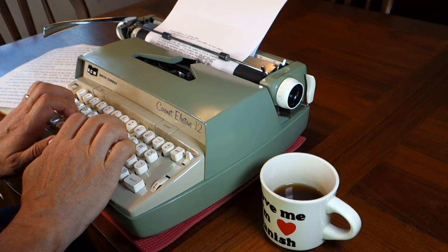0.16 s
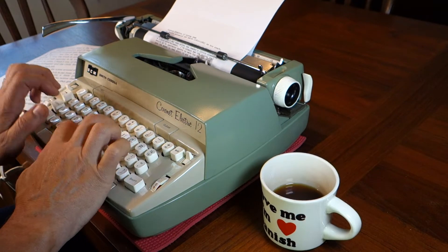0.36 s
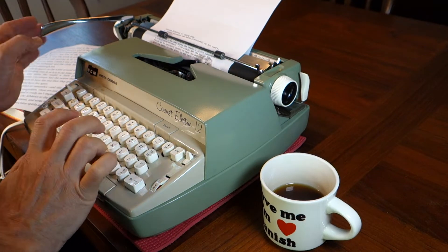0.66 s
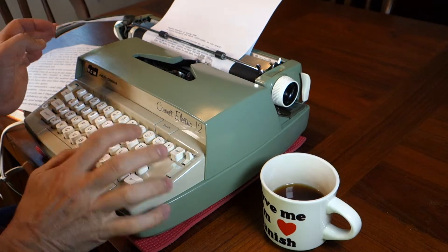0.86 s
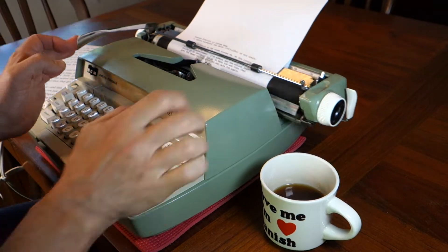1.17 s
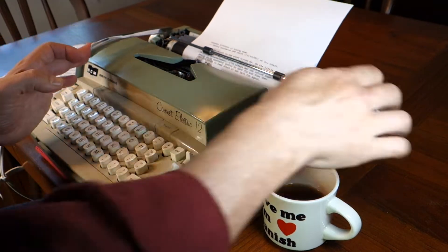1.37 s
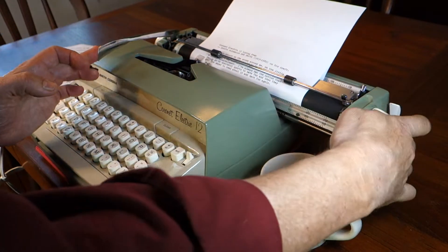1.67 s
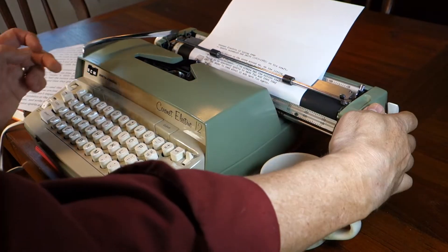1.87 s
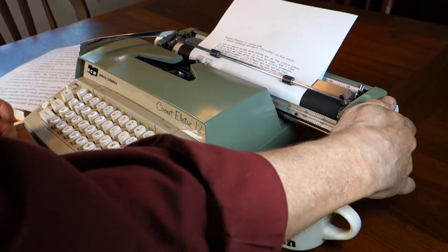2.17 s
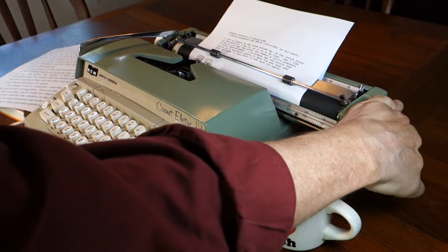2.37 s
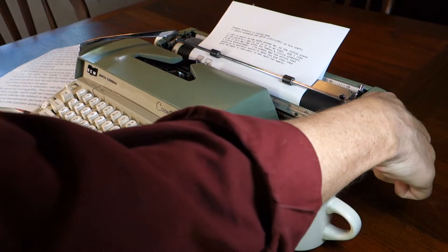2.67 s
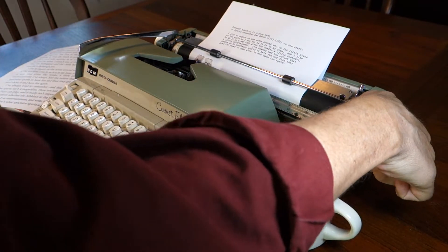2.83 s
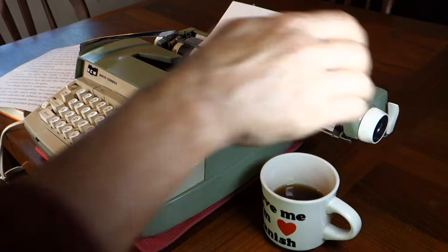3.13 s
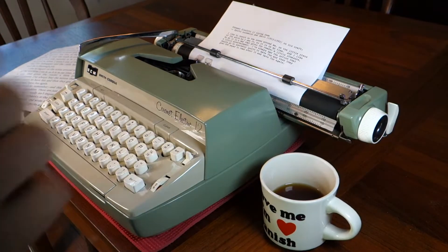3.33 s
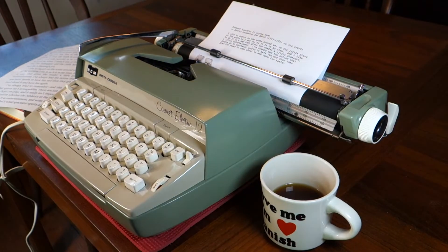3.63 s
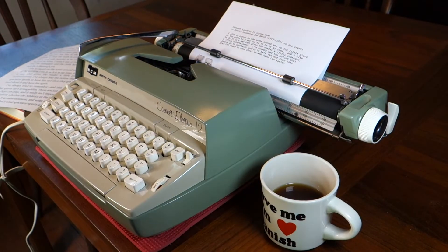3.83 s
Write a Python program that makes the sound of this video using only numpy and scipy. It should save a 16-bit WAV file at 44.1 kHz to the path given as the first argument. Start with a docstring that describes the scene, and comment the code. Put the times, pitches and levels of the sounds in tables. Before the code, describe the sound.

An electric typewriter strikes a few sharp letters, then its carriage slides and hits its stop. The roller knob clicks round and dull knocks follow, over a faint motor hum, close up in a small room.

```python
"""Electric typewriter in a small, live room

The machine stands on a wooden table, close to a stereo microphone. Its motor hums faintly throughout.
A few typebars strike and fall back; the carriage is released, slides and hits its stop. Then the platen
knob is turned through its ratchet, the carriage is pushed over with dull knocks, and a hand scuffs away."""
import sys
import numpy as np
from scipy import signal
from scipy.fft import rfft, irfft
from scipy.io import wavfile
from scipy.ndimage import uniform_filter1d

SR = 44100
rng = np.random.default_rng(int(sys.argv[2]) if len(sys.argv) > 2 else 0)


def wrap_up_sound(samples):
    """Save the sound to the file named by the first command line argument, as 16-bit audio."""
    columns = np.atleast_2d(samples).T
    # keep every value between -1 and 1, then stretch to whole-number steps
    tamed = np.clip(columns, -1, 1)
    steps = np.round(tamed * 32767).astype(np.int16)
    wavfile.write(sys.argv[1], SR, steps)


N = 176400
LEAD = 4410  # samples before time zero, so the first strike is already ringing
T = np.arange(-LEAD, N) / SR
TOP_HZ = 11000


def amp(db):
    """Decibels to gain."""
    return 10 ** (np.asarray(db) / 20)


def unit(x):
    """Scale to unit energy."""
    return x / np.sqrt(np.sum(x ** 2))


def conv(x, response):
    """Pass a sound through a response."""
    return signal.fftconvolve(x, response)[:len(x)]


def add(track, start, x):
    """Mix a sound in at a time in seconds."""
    i = max(int(round(start * SR)) + LEAD, 0)
    track[i:i + len(x)] += x[:len(track) - i]


def causal(gain):
    """The most prompt frequency response that has these gains."""
    cepstrum = irfft(np.log(gain))
    cepstrum[1:len(gain) - 1] *= 2
    cepstrum[len(gain):] = 0
    return np.exp(rfft(cepstrum))


def colour(x, points, tilt_db=0):
    """Filter of unit energy through (Hz, dB) points, tilted per octave."""
    hz, db = np.array(points, float).T
    octave = np.log2(np.maximum(np.fft.rfftfreq(2048, 1 / SR), 1))
    knots = np.log2(hz)
    curve = np.interp(octave, knots, db) + tilt_db * np.clip(octave, knots[0], knots[-1])
    curve -= 10 * np.maximum(knots[0] - octave, 0)
    curve -= 20 * np.maximum(octave - np.log2(TOP_HZ), 0)
    return conv(x, unit(irfft(causal(amp(curve)))))


def even(x):
    """Level out broad chance peaks in a response, keeping its energy."""
    spectrum = rfft(x, 2 * len(x))
    power = uniform_filter1d(np.abs(spectrum) ** 2, int(400 * len(x) / SR))
    flat = irfft(spectrum * causal(1 / np.sqrt(power)))[:len(x)]
    return np.linalg.norm(x) * unit(flat)


def grains(count, grain):
    """Dense tiny contacts; more grain makes their sizes less equal."""
    noise = rng.standard_normal(count)
    sizes = np.clip(rng.standard_normal(count // 16 + 1), -2, 2)
    return noise * np.exp(grain * np.repeat(sizes, 16)[:count])


def burst(rise_s, decay_s, grain=0):
    """One blow: contacts that swell and die away, evenly spread over all pitches."""
    t = np.arange(SR // 4) / SR
    envelope = (1 - np.exp(-t / max(rise_s, 1 / SR))) * np.exp(-t / max(decay_s, 1 / SR))
    spectrum = rfft(grains(len(t), grain) * envelope)
    flattened = irfft(spectrum / np.sqrt(np.abs(spectrum) + 1e-12), len(t))
    return unit(flattened * (envelope / envelope.max()) ** 0.25)


def ring(x, modes, t60):
    """Modes driven by a sound, each dying by 60 dB in t60 seconds."""
    t = np.arange(SR // 2) / SR
    decay = amp(-60 * t / t60)
    return conv(x, sum(amp(db) * unit(np.cos(2 * np.pi * hz * t) * decay) for hz, db in modes))


def walk(rate_hz):
    """Smooth random drift with a spread near 1."""
    hold = int(SR / rate_hz)
    steps = np.repeat(rng.standard_normal(len(T) // hold + 1), hold)
    return np.sqrt(2) * uniform_filter1d(uniform_filter1d(steps, hold), hold)[:len(T)]


def rub(levels, body, grain, flutter_db):
    """Uneven friction that follows (s, dB) points and is silent outside them."""
    contacts = unit(grains(len(T), grain)) * np.sqrt(len(T))
    db = np.interp(T, *np.transpose(levels), left=-np.inf, right=-np.inf)
    return colour(contacts * amp(db + flutter_db * walk(45)), body)


def blows(table, body):
    """Parts meet, each blow with its own softness and brightness."""
    out = np.zeros(len(T))
    for s, db, decay_s, tilt_db in table:
        blow = even(burst(0.25 * decay_s, decay_s, grain=0.25))
        add(out, s, amp(db) * colour(blow, body, tilt_db))
    return out


# The motor's hum lines. Each row: frequency in Hz, level in dB before the swell.
HUM_LINES = [(239.5, -64), (246, -71), (737.5, -71)]
# The swell of the hum. Each row: time in seconds, gain in dB.
HUM_SWELL = [(0.5, 1.5), (2.6, -5.5), (3.3, 4.5), (4.0, -2)]
# The tone of the drive. Each row: frequency in Hz, relative level in dB.
WHIRR_TONE = [(60, -18), (220, 2), (500, 0), (800, 4.5), (1150, -4.5), (1750, -2.5), (3000, -8.5),
              (11000, -18.5)]


def motor():
    """Wavering hum lines beat and reach the microphone dry; the drive's whirr fills the room."""
    hum = 0
    for hz, db in HUM_LINES:
        peak = np.sqrt(2) * amp(db + 2 * walk(6.45))
        wavering_hz = hz * (1 + 0.0064 * walk(14))
        hum += peak * np.sin(2 * np.pi * np.cumsum(wavering_hz) / SR)
    swell = amp(np.interp(T, *np.transpose(HUM_SWELL)))
    whirr = rub([(T[0], -62), (T[-1], -62)], WHIRR_TONE, grain=0.17, flutter_db=1.65)
    return hum * swell + room(whirr, wet_db=6.0)


# Typebar strikes. Each row: start in seconds, crack in dB, steel ping in dB,
# rattle against the crack in dB, fall-back clack in dB.
STRIKES = [(-.018, 4, 2, -2.5, -2.5), (0.2254, 0, 5, 1.5, 3), (0.3125, 0.5, -0.5, 2.5, 2),
           (0.4141, -2.5, -0.5, 6, 3), (0.58, 6, -17, -10, -1.5)]
# The drive cam catches before a strike. Each row: start in seconds, level in dB.
CAM_CATCHES = [(0.191, -4), (.199, -4), (.39, 1.5), (.548, -1), (.564, -4.5)]
# Tones of the crack, ping, fall-back and cam. Each row: frequency in Hz, relative level in dB.
CRACK_TONE = [(100, -21.5), (280, -6), (1000, 1), (2500, 6), (5000, 2.5), (8000, -2), (11000, -9)]
PING_TONE = [(1500, -22), (4300, -7.5), (5300, -8), (5950, 2), (6500, -4), (7300, -11), (11000, -19.5)]
FALL_TONE = [(90, -10.5), (260, -12.5), (450, 0), (580, 5), (760, 8), (1200, 1), (3200, 4), (11000, -6)]
CAM_TONE = [(100, -29), (850, -4), (3200, -11.5), (11000, -19)]
# Modes of the steel bars and of the frame. Each row: frequency in Hz, level in dB.
BAR_MODES = [(5480, -28), (6099, -33), (6147, -33), (6410, -30)]
FRAME_MODES = [(431, -12), (471, -12), (715, -19)]


def typebars():
    """Thrown by a cam, each bar cracks on the platen, pings, rattles, falls back and rings the frame."""
    cracks, pings, falls, cams = np.zeros((4, len(T)))
    grain, fall_after_s = 0.46, 0.046
    for s, crack_db, ping_db, rattle_db, fall_db in STRIKES:
        crack = burst(0, 0.0022)
        rattle = amp(rattle_db) * burst(0.0022, 0.044, grain)
        blow = even(crack + rattle)
        add(cracks, s, amp(crack_db) * blow)
        add(pings, s, amp(ping_db) * blow)
        add(falls, s + fall_after_s, amp(fall_db) * burst(0.0033, 0.019, grain))
    for s, db in CAM_CATCHES:
        add(cams, s, amp(db) * burst(0.00051, 0.063, grain))
    strike = colour(cracks, CRACK_TONE) + colour(pings, PING_TONE) + ring(pings, BAR_MODES, t60=0.25)
    action = colour(falls, FALL_TONE) + ring(falls, FRAME_MODES, t60=0.1) + colour(cams, CAM_TONE)
    return room(strike, wet_db=1.5) + room(action, wet_db=-3.5)


# Modes of the carriage. Each row: frequency in Hz, level in dB.
CARRIAGE_MODES = [(1810, -23), (3230, -23), (3420, -22)]


def carriage(x):
    """A sound together with the brief ring it draws from the steel of the carriage."""
    return x + ring(x, CARRIAGE_MODES, t60=0.045)


# Key and carriage clacks. Each row: start in seconds, level in dB, decay in seconds, tilt in dB/octave.
CLACKS = [(.1775, -11, 0.0032, 5.5), (.842, -12, 0.0036, 0.5), (.8462, -1, 0.0019, 2.5),
          (.863, -8, 0.012, -2), (1.5375, 0.5, 0.0083, 0), (1.833, -8, 0.01, 0),
          (1.861, -10.5, 0.0092, 0.5), (1.881, -5, 0.014, -2.1), (3.765, -20.5, 0.007, 0.5)]
# Their tone. Each row: frequency in Hz, relative level in dB.
CLACK_TONE = [(60, -16.5), (220, -8.5), (450, 0.5), (1500, 1), (1780, 3.5), (2200, -0.5), (3300, 1),
              (11000, -5)]


def clacks():
    """Hard, short blows of the keys and of the carriage at its release and its stop."""
    return carriage(blows(CLACKS, CLACK_TONE))


# The carriage's run. Each row: time in seconds, level in dB.
SLIDE_LEVELS = [(.87, -60), (.92, -49), (1.0, -49), (1.03, -42), (1.17, -41.5), (1.47, -50.5),
                (1.54, -47.5)]
# The tone of rubbing parts, and the modes of the rail. Each row: frequency in Hz, relative level in dB.
FRICTION_TONE = [(150, -13.5), (850, 2.5), (2200, -0.5), (4200, 0.5), (5200, -2.5), (11000, -10.5)]
RAIL_MODES = [(1040, -24), (1600, -25), (4220, -23)]


def slide():
    """The carriage rasps along its rail and rings it."""
    rasp = rub(SLIDE_LEVELS, FRICTION_TONE, grain=0.7, flutter_db=0.67)
    return rasp + ring(rasp, RAIL_MODES, t60=0.02)


# Clicks of the ratchet pawl. Each row: time of the snap in seconds, level in dB.
PAWL_CLICKS = [(1.7517, -31), (1.8075, -28.5), (1.9639, -17), (1.9746, -13), (2.0139, -15.5),
               (2.0191, -11.5), (2.0679, -14), (2.115, -19), (2.124, -16.5), (2.194, -14.5), (2.2549, -13),
               (2.331, -17), (2.427, -19), (2.542, -18), (2.674, -25)]
# Their tone. Each row: frequency in Hz, relative level in dB.
PAWL_TONE = [(300, -7), (1500, -12), (2600, -3), (8000, -9.5), (11000, -12.5)]


def ratchet():
    """The pawl rides up each tooth, snaps into the next notch and chatters there."""
    out = np.zeros(len(T))
    for s, db in PAWL_CLICKS:
        ride = burst(0, 0.034, grain=0.25)[::-1]  # swells up to the snap
        add(out, s - len(ride) / SR, amp(db - 3.5) * ride)
        snap = burst(0.00026, 0.0023)
        chatter = amp(-7.5) * burst(0.0023, 0.011, grain=0.46)
        add(out, s, amp(db) * even(snap + chatter))
    return carriage(colour(out, PAWL_TONE))


# The turn of the platen. Each row: time in seconds, level in dB.
PLATEN_LEVELS = [(1.86, -33), (1.95, -50), (2.05, -46), (2.14, -53), (2.54, -59), (2.72, -59)]


def platen():
    """The platen rubs as it turns and rings the carriage."""
    return carriage(rub(PLATEN_LEVELS, FRICTION_TONE, grain=0.58, flutter_db=1.5))


# Carriage knocks. Each row: start in seconds, level in dB, decay in seconds, tilt in dB/octave.
KNOCKS = [(2.456, -16, 0.022, 4), (2.696, -7.5, 0.061, 3.5), (2.7665, -4, 0.015, 3), (2.845, -15, .025, 2),
          (2.9185, 2.5, 0.0078, 0), (2.929, 0.5, 0.018, 3)]
# Their tone. Each row: frequency in Hz, relative level in dB.
KNOCK_TONE = [(50, -14), (400, 1.5), (850, 0.5), (1400, -7.5), (1850, -6.5), (7000, -25.5), (11000, -41)]


def knocks():
    """The carriage is pushed over and its parts meet in dull blows."""
    return blows(KNOCKS, KNOCK_TONE)


# The hand's scuff. Each row: time in seconds, level in dB.
SCUFF_LEVELS = [(3.527, -58), (3.568, -43), (3.615, -49)]


def scuff():
    """A hand brushes the machine as it leaves."""
    return rub(SCUFF_LEVELS, CLACK_TONE, grain=0.87, flutter_db=0.67)


# The room around the table. Each row: frequency in Hz, reverberation time in seconds,
# side against mid in dB.
ROOM_BANDS = [(350, 0.42, -17.5), (2840, 0.32, -6), (5900, 0.28, -1), (10100, 0.22, 3)]


def room(x, wet_db):
    """At the microphone: direct sound plus a diffuse tail, narrow in the bass and wide in the treble."""
    build_s, left_lag_s = 0.00063, 0.000006
    t, hz = np.arange(SR // 2) / SR, np.fft.rfftfreq(SR // 2, 1 / SR)
    noise, tail = rfft(rng.standard_normal((2, len(t)))), 0
    log_centres = np.log([row[0] for row in ROOM_BANDS])
    for pick, (_, t60, side_db) in zip(np.eye(len(ROOM_BANDS)), ROOM_BANDS):
        band = np.interp(np.log(hz + 1), log_centres, pick)
        mid, side = irfft(noise * band, len(t))
        tail += np.array([mid, amp(side_db) * side]) * amp(-60 * t / t60)
    tail *= 1 - np.exp(-t / build_s)
    tail *= amp(wet_db) / np.linalg.norm(tail[0])
    mid = conv(x, even(signal.unit_impulse(len(t)) + tail[0]))
    side = conv(x, tail[1])
    lag = left_lag_s * SR * (np.roll(x, 1) - np.roll(x, -1)) / 2  # direct sound is a hair late on the left
    return np.array([mid + side + lag, mid - side])


def scene():
    """The whole machine from one microphone position, each part with its own share of the room."""
    friction = slide() + platen() + scuff()
    out = (typebars()
           + room(clacks(), wet_db=0.0)
           + room(knocks(), wet_db=-1.5)
           + room(ratchet(), wet_db=-6.0)
           + room(friction, wet_db=-3.0)
           + motor())
    return out[:, LEAD:]


def record(dry):
    """The recorder cuts the top steeply."""
    return signal.sosfilt(signal.ellip(10, .2, 80, TOP_HZ, fs=SR, output="sos"), dry)


dry = scene()
out = record(dry)
wrap_up_sound(out)
```